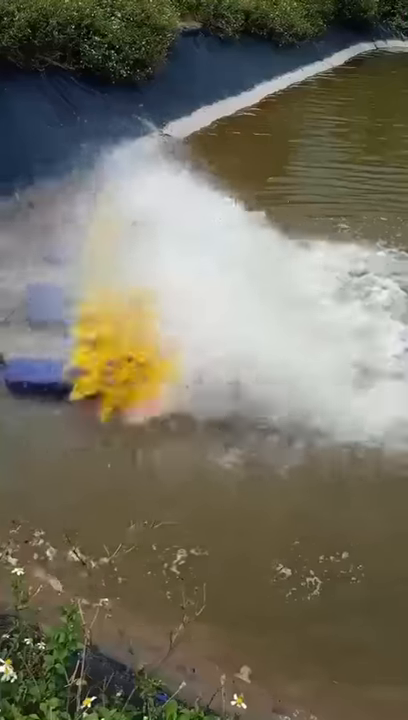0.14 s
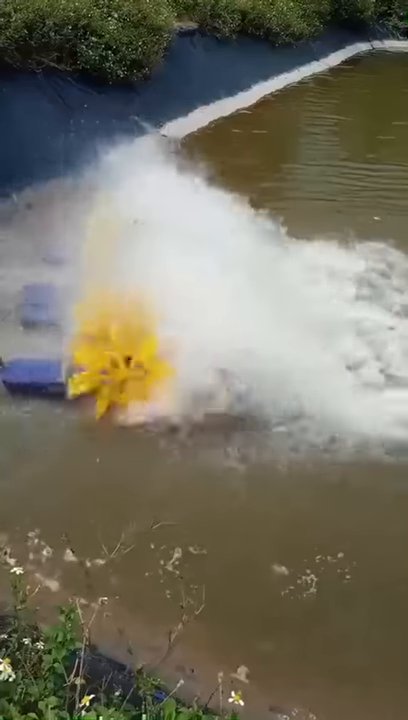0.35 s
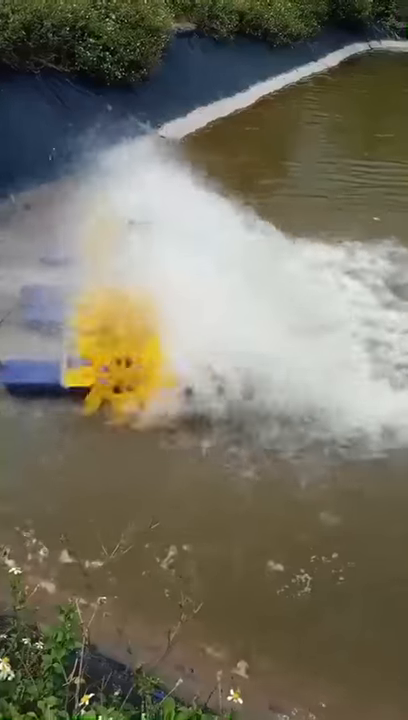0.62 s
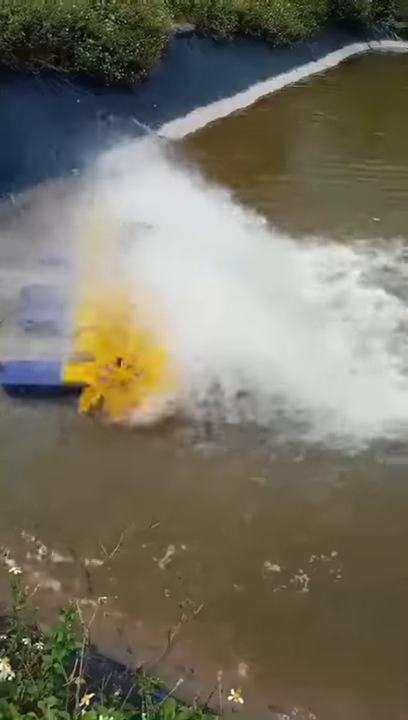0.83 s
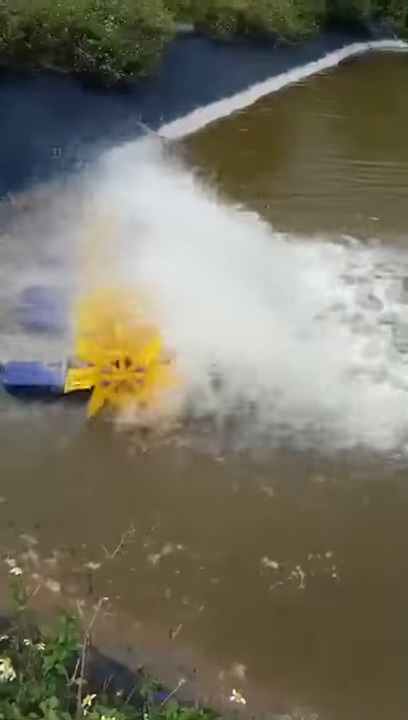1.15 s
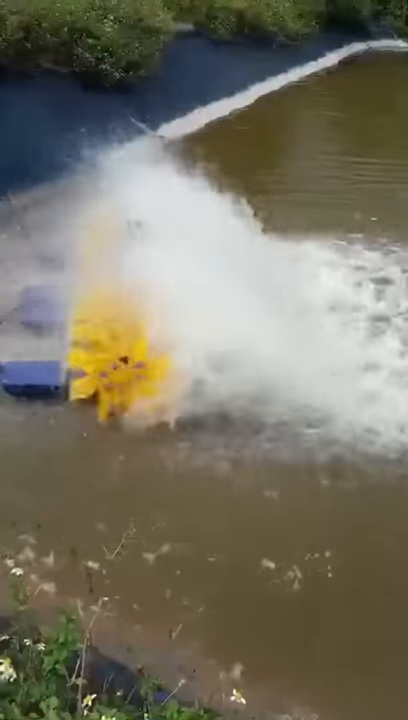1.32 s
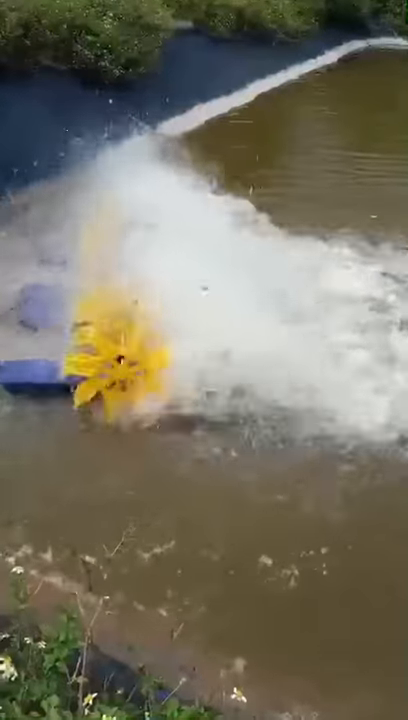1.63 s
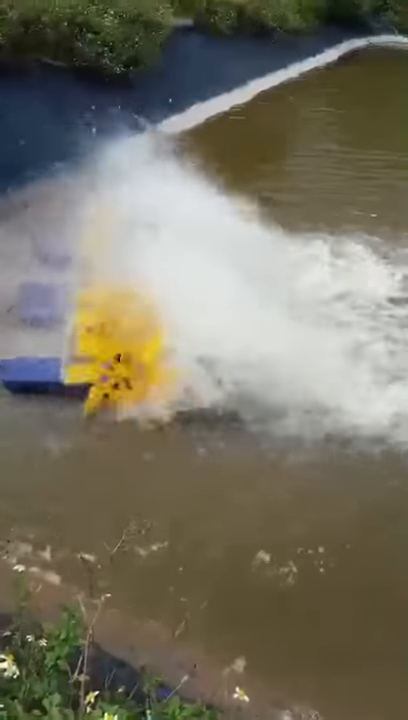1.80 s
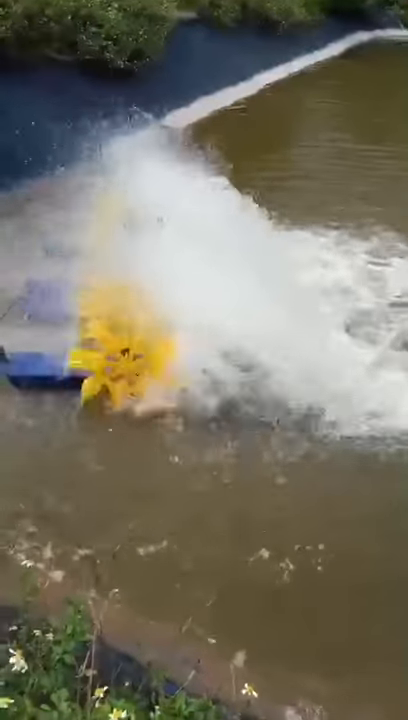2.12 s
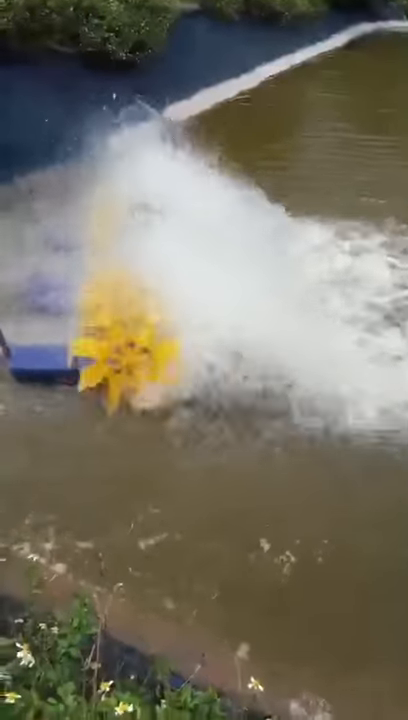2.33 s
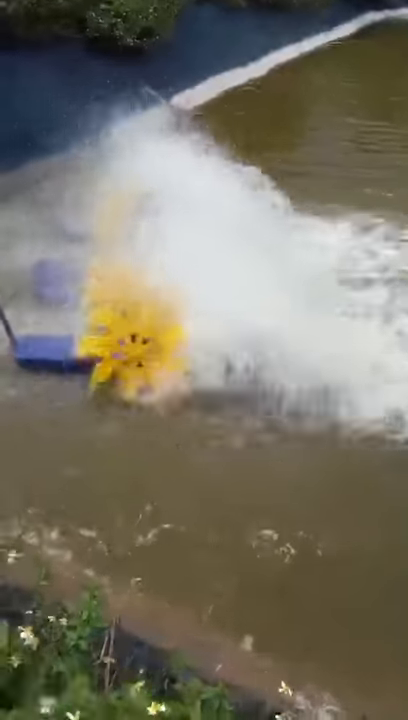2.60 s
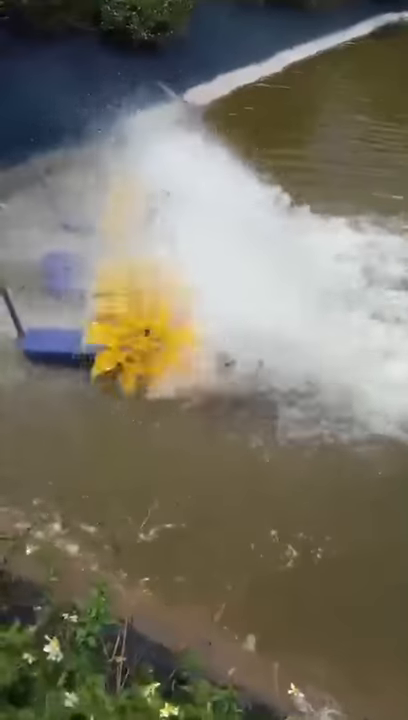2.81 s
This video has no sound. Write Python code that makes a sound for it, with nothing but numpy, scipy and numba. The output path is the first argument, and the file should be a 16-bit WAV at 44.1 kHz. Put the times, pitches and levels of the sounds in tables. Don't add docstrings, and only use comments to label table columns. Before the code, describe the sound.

A paddle wheel aerator churns a pond in a dense, steady rush of splashing, bubbling water

```python
import sys
import numpy as np
from scipy import signal
from scipy.fft import rfft, irfft
from scipy.io import wavfile
from scipy.ndimage import uniform_filter1d
from numba import njit

SR = 44100
rng = np.random.default_rng(int(sys.argv[2]) if len(sys.argv) > 2 else 0)


def attenuation_scalar(level_db):
    decades = np.asarray(level_db, float) / 20
    return 10 ** decades


def transcribe(u):
    v = np.clip(np.atleast_2d(u).T, -1, 1)
    q = np.round(v * 32767).astype(np.int16)
    wavfile.write(sys.argv[1], SR, q)


N = 130095

# time in seconds, level in dB.
CHURN_LEVEL = [(0.5, -28), (1.38, -28), (1.59, -30), (1.6, -27.5), (1.78, -28), (2.81, -28), (2.87, -29),
               (2.95, -26.5)]
# time in seconds, level in dB.
SPRAY_FALL = [(0.12, -1.5), (0.25, -0.5), (0.4, 0), (0.9, 0), (1.4, .5), (1.75, -0.5), (1.9, -1.5),
              (2.1, -0.5), (2.3, -0.5), (2.95, .5)]
# frequency in Hz, level in dB per Hz.
WATER_COLOUR = [(18, -62), (30, -38), (70, -27), (130, -4), (200, -4), (508, -2.5), (620, 0.5), (732, 3),
                (1600, -2.5), (2080, -43), (3520, -120)]
# frequency in Hz, level in dB per Hz.
FOAM_COLOUR = [(1100, -25), (1450, -12.5), (1700, -4.5), (1900, 0), (2300, -1.5), (2600, -1.5), (2850, -10),
               (3500, -23.5)]
# frequency in Hz, level in dB per Hz.
SPRAY_COLOUR = [(2600, -31), (3200, -2.5), (4800, -3), (6400, -1.5), (7200, 1.5), (7800, -1), (9200, 1.5),
                (10700, -16.5)]
# births per second, lowest pitch in Hz,
# highest pitch in Hz, length in cycles, pitch slide as a share of the pitch, size spread in dB, level in dB.
BIG_GLUGS = (69, 115, 456, 21.5, -1.2, 4, -25)
MIDDLE_BUBBLES = (451.5, 582.5, 1375, 11.0, 0.3, 3.5, -12.5)
SMALL_FROTH = (1508.5, 1747, 2753.5, 13.5, 0.07, 3.0, -6)
# start in seconds, peak level in dB, pitch in Hz.
BLADE_SLAPS = [(0.44, -25, 950), (0.658, -26.5, 753), (0.77, -22.5, 736), (1.241, -24, 693),
               (1.319, -19, 697), (1.424, -21, 654), (1.497, -22, 974), (1.605, -14.5, 810),
               (1.809, -27.5, 872), (1.889, -23.5, 735), (2.019, -23, 807), (2.434, -27, 1010),
               (2.543, -24.5, 634), (2.693, -17, 724), (2.789, -26, 880)]
# start in seconds, peak level in dB, pitch in Hz.
FLOAT_SURGES = [(0.32, -47, 191), (0.511, -47.5, 142), (0.758, -40.5, 142), (0.909, -39.5, 178),
                (1.13, -42.5, 146), (1.29, -42, 156.4), (1.43, -48.5, 124.6), (1.584, -38, 134.7),
                (1.955, -47, 129), (2.202, -39.5, 188.7), (2.527, -38.5, 169), (2.675, -40.5, 141.3),
                (2.852, -42, 137)]
# time in seconds, level in dB.
WHINE_LEVEL = [(0.45, -42.5), (0.7, -38.5), (0.95, -46.5), (1.2, -40.5), (1.45, -45.5), (1.7, -50.5),
               (1.95, -41), (2.15, -46), (2.4, -39), (2.6, -38), (2.8, -47), (2.95, -59)]
# frequency in Hz, step over the usual strength in
# dB.
ROUNDING = [(300, -14), (2800, -6), (3300, 2), (5000, 2), (7000, 0), (9200, 0), (9700, 9), (10500, 12.5)]


def rms_one(x):
    return x / np.sqrt(np.mean(x ** 2) + 1e-20)


def curve(rows):
    seconds, level = np.transpose(rows)
    return np.interp(np.arange(N) / SR, seconds, level)


def drift(rate_hz):
    r = np.exp(-80 * np.pi * rate_hz / SR)
    settle = 2000
    slow = signal.lfilter([1], [1, -2 * r, r * r], rng.standard_normal(N // 40 + settle + 2))[settle:]
    return np.interp(np.arange(N) / 40, np.arange(len(slow)), rms_one(slow))


def rumble():
    return attenuation_scalar(-41.5) * drift(25.0)


def gearbox():
    whine_hz, shaft_hz, hum_hz = 2006, 26, 319.7
    t = np.arange(N) / SR
    turn = 2 * np.pi * whine_hz * t + 0.65 * drift(1.8)
    side = attenuation_scalar(-17) * np.sin(turn + 2 * np.pi * shaft_hz * t)
    whine = attenuation_scalar(curve(WHINE_LEVEL)) * (np.sin(turn) + side)
    hum = attenuation_scalar(-57.5 + 1.7 * drift(4.6)) * np.sin(2 * np.pi * hum_hz * t)
    return np.sqrt(2) * (whine + hum)


def surges():
    level_db, rise_s = -1.5, 0.025
    t = np.arange(N) / SR
    out = np.zeros(N)
    for start, db, hz in FLOAT_SURGES:
        age = np.clip(t - start, 0, None) / rise_s
        swell = age * np.exp(1 - age)
        out += attenuation_scalar(db + level_db) * swell * np.sin(2 * np.pi * hz * (t - start))
    return out


def rush(colour_table, shared_db):
    points = np.array(colour_table)
    hz = np.maximum(np.arange(N // 2 + 1) * SR / N, 1)
    colour_db = np.interp(np.log(hz), np.log(points[:, 0]), points[:, 1], left=-200, right=-200)
    colour = attenuation_scalar(colour_db)
    noise = rfft(rng.standard_normal(N)) * colour
    common_db = shared_db - 0.15 * drift(2.0)
    out = np.zeros(N)
    for centre in np.arange(9, 28) / 2:
        share = np.clip(1 - 2 * np.abs(np.log2(hz) - centre), 0, 1)
        if np.max(share * colour) > 1e-6:
            flicker_db = 1.3 * drift(19.0)
            out += irfft(noise * share, N) * attenuation_scalar(common_db + flicker_db)
    return rms_one(out)


def spray(shared_db):
    return attenuation_scalar(curve(SPRAY_FALL) - 6) * rush(SPRAY_COLOUR, shared_db)


@njit
def add_rings(out, start, hz, size, cycles, slide, sr):
    for k in range(len(start)):
        length = int(cycles * sr / hz[k])
        phase = 0.0
        for i in range(min(length, len(out) - start[k])):
            phase += 2 * np.pi * hz[k] * (1 + slide * i / length) / sr
            out[start[k] + i] += size[k] * np.sin(phase) * np.exp(-5 * i / length)


def bubbles(family, shared_db):
    per_s, low_hz, high_hz, cycles, slide, spread_db, level_db = family
    chance, pitch, luck, side = rng.random((4, N))
    births_per_s = per_s * attenuation_scalar(2 * shared_db + 3 * drift(6.0))
    born = np.flatnonzero(chance < births_per_s / SR)
    hz = low_hz * (high_hz / low_hz) ** pitch[born]
    size = attenuation_scalar(-spread_db * np.log(np.maximum(luck[born], 0.01)))
    size = size * np.sign(side[born] - 0.5)
    out = np.zeros(N)
    add_rings(out, born, hz, size, cycles, slide, float(SR))
    return attenuation_scalar(level_db) * rms_one(out)


def churned_water(shared_db):
    water = attenuation_scalar(-5) * rush(WATER_COLOUR, shared_db)
    foam = attenuation_scalar(-3.5) * rush(FOAM_COLOUR, shared_db)
    ringing = sum(bubbles(family, shared_db) for family in (BIG_GLUGS, MIDDLE_BUBBLES, SMALL_FROTH))
    return water + foam + ringing


def slaps():
    level_db, fade_60db_s = -3.5, 0.034
    t = np.arange(N) / SR
    out = np.zeros(N)
    for start, db, hz in BLADE_SLAPS:
        fade_db = -60 * np.clip(t - start, 0, 1) / fade_60db_s
        out += attenuation_scalar(db + level_db + fade_db) * (t >= start) * np.sin(2 * np.pi * hz * (t - start))
    return out


def blade_beat():
    blades_per_s, swing_db = 29, 0.49
    blade = np.cumsum(blades_per_s * (1 + 0.04 * drift(2.0))) / SR
    saw = 1 - 2 * (blade % 1)
    return swing_db * np.sqrt(3) * saw + 0.12 * drift(4.6)


def scene():
    shared_db = blade_beat()
    background = rumble() + gearbox() + surges()
    churning = attenuation_scalar(curve(CHURN_LEVEL) - 1.0) * (spray(shared_db) + churned_water(shared_db))
    mono = background + churning + slaps()
    return np.array([mono, mono])


def round_tones(x, size=1024):
    top_hz, wobble_db, easing_db = 10570, 1.4, 4.5
    n, k, points = np.arange(2 * size), np.arange(size), np.array(ROUNDING)
    window = np.sin(np.pi * (n + 0.5) / (2 * size))
    tones = window * np.cos(np.pi / size * np.outer(k + 0.5, n + 0.5 + size / 2))
    frames = N // size + 2
    where = np.arange(frames)[:, None] * size + n
    padded = np.concatenate([np.zeros(size), x, np.zeros(3 * size)])
    lines = padded[where] @ tones.T
    hz = (k + 0.5) * SR / (2 * size)
    usual = np.sqrt(uniform_filter1d(np.mean(lines ** 2, axis=0), size=15) + 1e-20)

    treble_hz = points[-3, 0]
    by_frame = rng.standard_normal((frames, 1))
    by_band = uniform_filter1d(rng.standard_normal((frames, size // 8)), 3, axis=0)
    wobble = by_frame + 2.2 * np.repeat(by_band, 8, axis=1) * (hz < treble_hz)
    easing = np.linspace(0.5, -0.5, frames)[:, None] * (hz > treble_hz)
    step_db = np.interp(hz, points[:, 0], points[:, 1]) + wobble_db * wobble + easing_db * easing
    step = usual * attenuation_scalar(step_db)

    rounded = np.sign(lines) * np.floor(np.abs(lines) / step + 0.4) * step * (hz < top_hz)
    out = np.zeros(len(padded))
    np.add.at(out, where, rounded @ tones * 2 / size)
    return out[size:size + N]


def roll_off(x):
    return signal.sosfilt(signal.butter(12, 10810, fs=SR, output="sos"), x)


def record(dry):
    low_cut_hz, ceiling, offset = 95, 0.35, 0.0006
    start_s, fade_s, fade_from = 0.1238, 0.32, 0.037
    t = np.arange(N) / SR
    cut = signal.sosfilt(signal.butter(3, low_cut_hz, "high", fs=SR, output="sos"), dry[0])
    limited = ceiling * np.tanh(cut / ceiling)
    fade = np.clip(fade_from + (t - start_s) / fade_s, 0, 1) * (t >= start_s)
    mono = (round_tones(limited) + offset) * fade
    return roll_off(np.array([mono, mono]))


dry = scene()
out = record(dry)
transcribe(out)
```